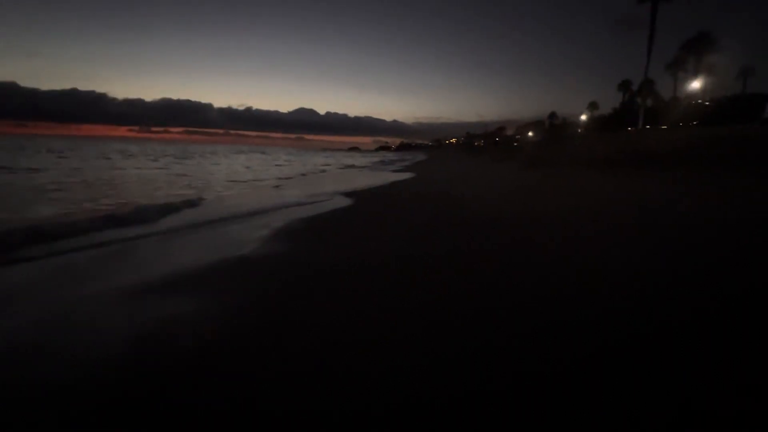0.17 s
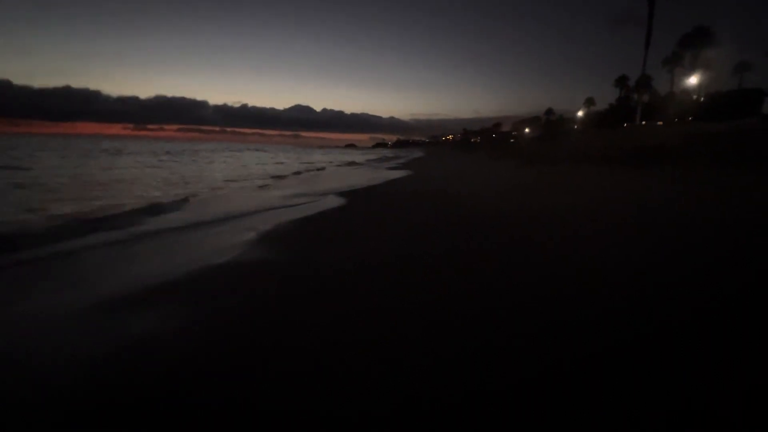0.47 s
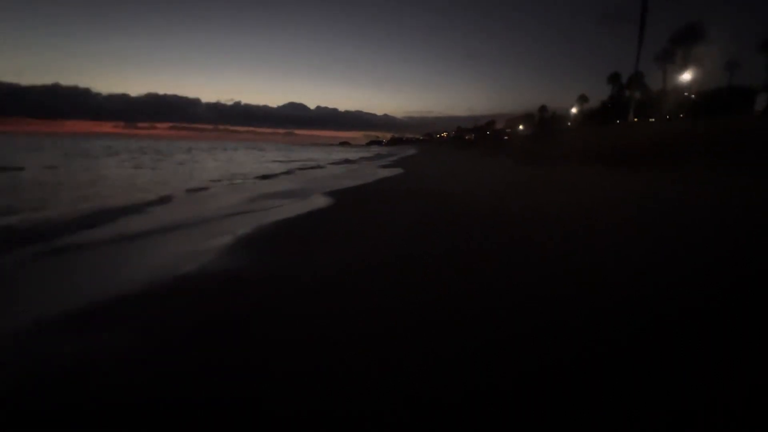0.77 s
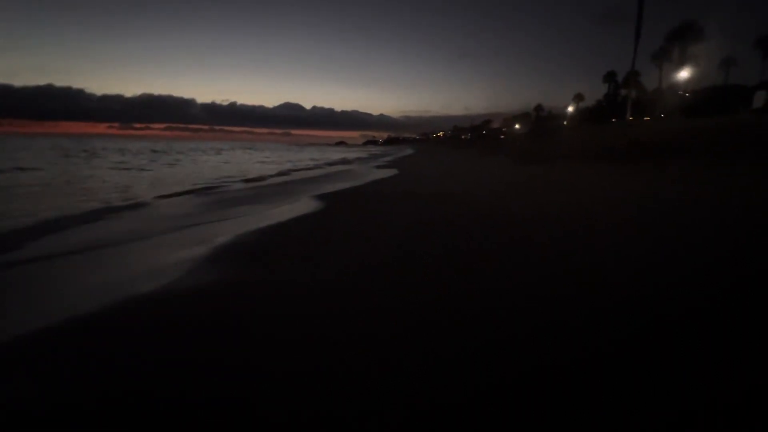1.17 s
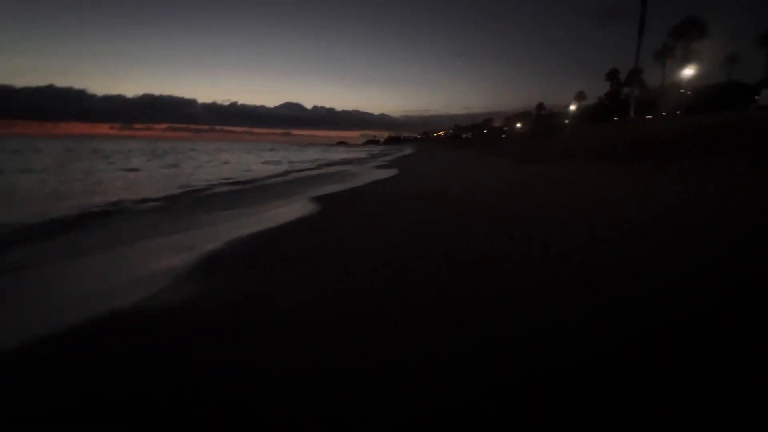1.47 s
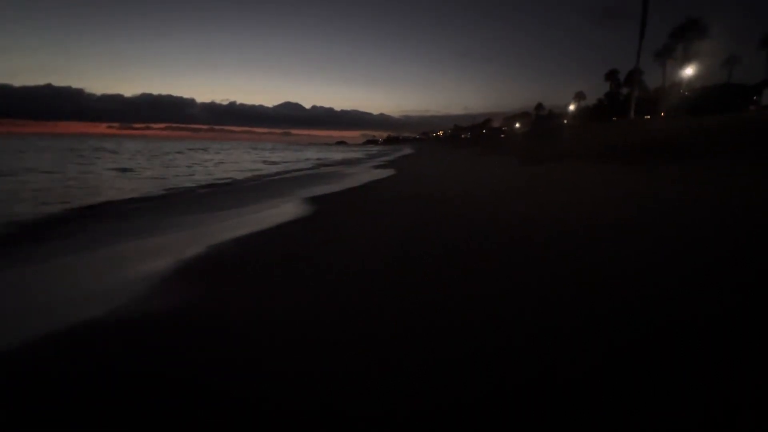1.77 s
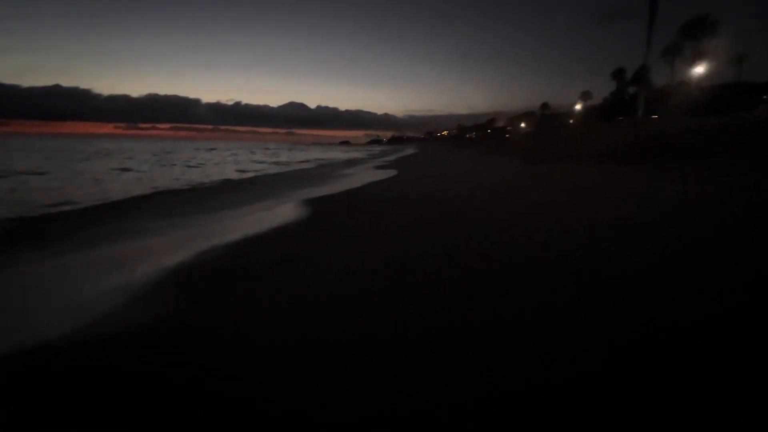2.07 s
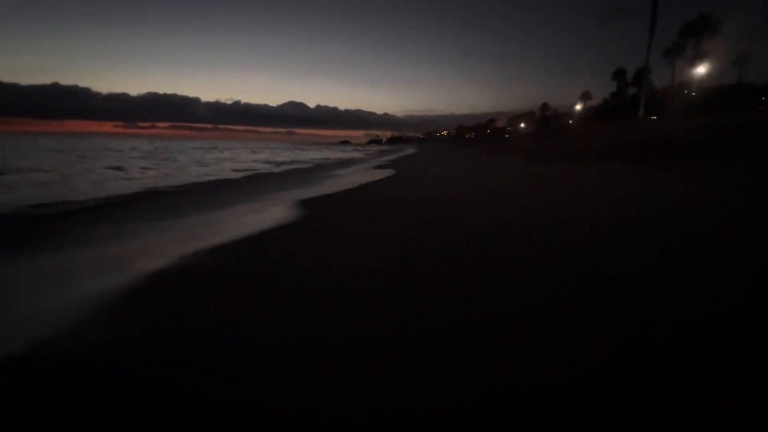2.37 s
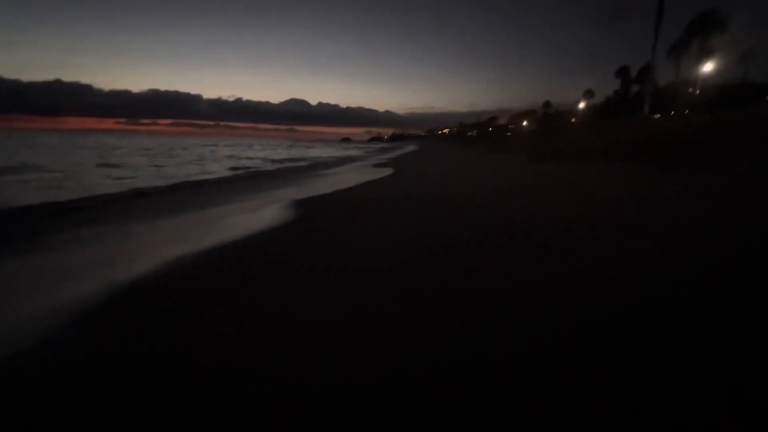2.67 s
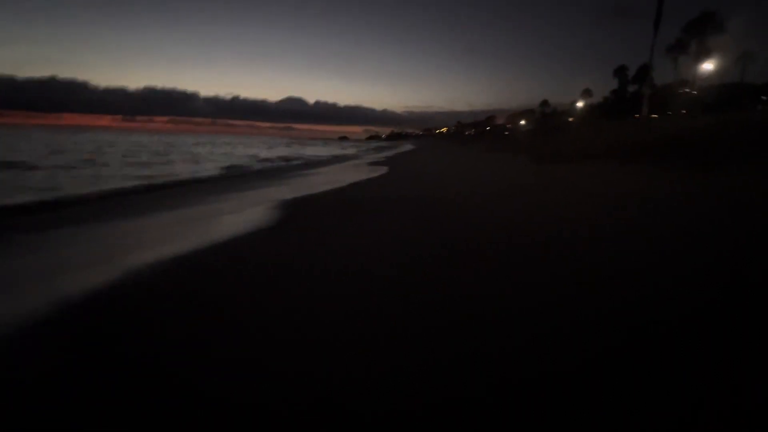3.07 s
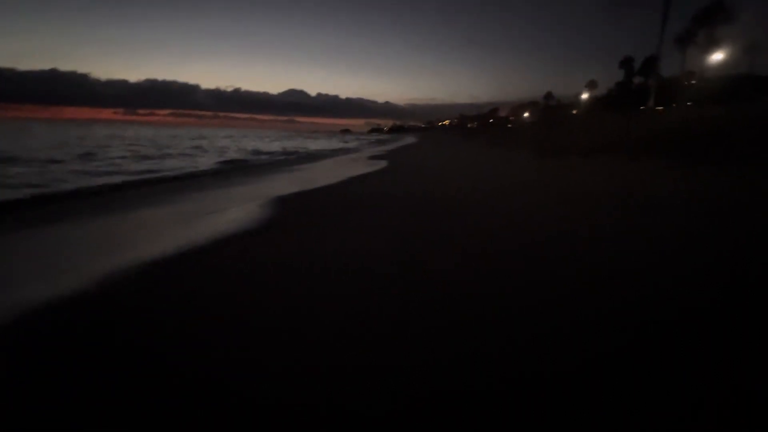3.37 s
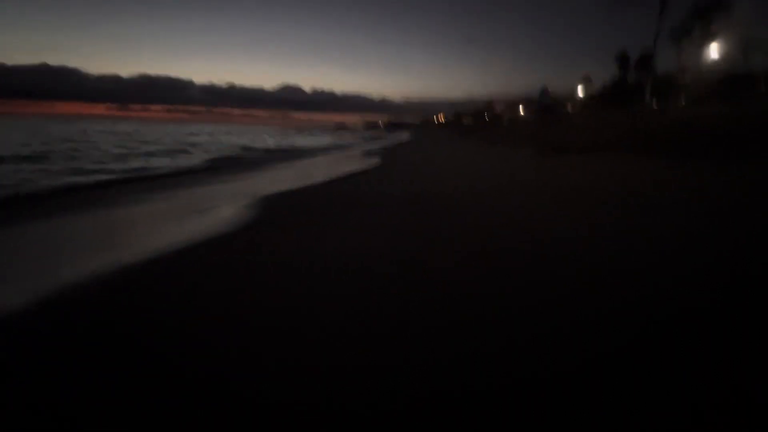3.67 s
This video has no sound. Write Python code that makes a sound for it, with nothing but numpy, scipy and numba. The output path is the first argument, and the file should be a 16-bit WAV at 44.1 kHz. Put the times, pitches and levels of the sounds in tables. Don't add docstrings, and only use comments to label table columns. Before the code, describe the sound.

Small waves washing up a sandy shore, with fizzing foam and low distant breaker rumble

```python
import sys
import numpy as np
from scipy import signal
from scipy.fft import rfft, irfft, next_fast_len
from scipy.io import wavfile
from scipy.ndimage import uniform_filter1d
from numba import njit

SR = 44100
rng = np.random.default_rng(int(sys.argv[2]) if len(sys.argv) > 2 else 0)


def voltage_ratio(decibels):
    exponent = np.asarray(decibels, float) / 20
    return 10 ** exponent


def generate_wav(sig):
    pcm = np.round(np.clip(np.atleast_2d(sig).T, -1, 1) * 32767).astype(np.int16)
    wavfile.write(sys.argv[1], SR, pcm)


N = 168021
T = np.arange(N) / SR
SIZE = next_fast_len(N)
HZ = np.maximum(np.arange(SIZE // 2 + 1) * SR / SIZE, 1)

# t/s, level/dB
RUMBLE_LEVEL = [(0, -33), (.08, -31.5), (.2, -34), (.33, -31.5), (.43, -35), (.55, -34.5), (.9, -36.5),
                (1.25, -36), (1.45, -35.5), (1.62, -37.5), (1.9, -35.5), (2.1, -36), (2.35, -36.5),
                (2.55, -36), (2.7, -38.5), (2.85, -40), (3.25, -40.5), (3.6, -38.5), (3.81, -37.5)]
ROAR_LEVEL = [(0, -40), (.5, -41.5), (.7, -43), (1.2, -42.5), (1.6, -43), (2.05, -40.5), (2.45, -42),
              (3.0, -42), (3.5, -41.5), (3.81, -42.5)]
SWASH_LEVEL = [(0, -42.5), (.22, -46.5), (.45, -43), (.8, -48), (1.3, -45.5), (1.65, -50), (2.1, -49.5),
               (2.45, -46), (3.2, -50.5), (3.55, -45), (3.81, -44)]
FOAM_LEVEL = [(0, -46.5), (.2, -51.5), (.5, -48.5), (.72, -49), (.9, -47.5), (1.08, -48.5), (1.3, -51.5),
              (1.5, -51), (1.68, -55.5), (2.0, -53), (2.15, -57), (2.38, -54), (2.6, -52.5), (2.85, -55.5),
              (3.1, -60.5), (3.5, -60.5), (3.81, -64)]
MIST_LEVEL = [(0, -50.5), (.25, -57), (.5, -54.5), (.9, -57), (1.23, -54.5), (1.65, -60.5), (2.0, -58),
              (2.15, -58.5), (2.45, -58), (2.9, -59), (3.1, -63), (3.3, -61.5), (3.6, -58.5), (3.81, -61)]
WIND_LEVEL = [(0, -52), (.15, -50), (.3, -47), (.45, -55), (1.2, -59), (1.7, -52), (1.85, -51), (2.1, -61),
              (2.3, -50), (2.75, -58), (2.93, -50.5), (3.1, -54), (3.4, -57), (3.65, -52.5), (3.81, -52)]

# f/Hz, density/dB
RUMBLE_TONE = [(22, -44), (40, -50), (65, -3.5), (110, -1), (210, -1), (320, -2), (480, -8.5), (800, -27.5)]
ROAR_TONE = [(250, -24), (450, -3.5), (620, -2.5), (800, -1.5), (1050, -2.5), (1250, -6), (1700, -8.5),
             (3000, -25)]
SWASH_TONE = [(700, -18), (1200, -3.5), (1600, -2.5), (2000, -8), (2600, -7), (3500, -11.5), (5000, -42),
              (7000, -25.5)]
FOAM_TONE = [(2000, -14), (3500, 2), (5000, -1), (6200, -3.5), (7500, -4), (9000, -12)]
MIST_TONE = [(5000, -8), (6800, -8.5), (8300, -1), (9700, 1.5), (10700, 3.5), (12300, -8), (14000, -7),
             (15800, -5)]
WIND_TONE = [(16, -26), (28, -8), (40, -7), (52, 8), (80, -11), (140, -33.5)]
TONGUE_TONE = [(600, -11), (1100, -7), (1600, 4), (2500, -8), (3500, -10), (5000, -20), (7000, -18),
               (12500, -34)]
SPIT_TONE = [(4000, -22), (9000, -1), (13000, .1), (16000, -1.0)]

# t/s, level/dB, length/s
SPITS = [
    (.0, -50, 0.034),
    (1.23, -59, .04),
    (2.028, -47, .025),
    (3.158, -47, 0.015),
    (3.69, -63, .02),
]
# t/s, level/dB, f/Hz, length/s
THUDS = [(.0, -23, 102, 0.017), (0.078, -31.5, 277, 0.033), (0.157, -36, 80, 0.046),
         (0.24, -35.5, 202, 0.053), (0.29, -41, 85, 0.041), (0.36, -33.5, 212, 0.083),
         (0.56, -39.5, 373, 0.099), (0.578, -42, 130, 0.024), (1.425, -42, 270, .04),
         (1.605, -31.5, 152, 0.018), (1.775, -40.5, 251, 0.022), (2.218, -36.5, 150, 0.047),
         (2.33, -42, 120, .03), (2.405, -38.5, 330, 0.055), (2.455, -37, 129, 0.02),
         (2.551, -35.5, 253, 0.024), (2.59, -39, 120, 0.036), (3.03, -44, 65, 0.061),
         (3.427, -53, 90, 0.064)]
TONGUE_S, TONGUE_DB = (.55, .85, 1.3, 1.6), -44.5

# f/Hz, gain/dB
LEFT_PORT = [(200, 3.5), (600, 3), (900, 3.5), (2000, 4), (3600, 2), (6800, 1), (9200, 0.5), (10000, -1)]
# f/Hz, width/Hz, gain/dB
LEFT_RINGS = [(5090, 1250, 11.2), (8380, 200, 2.2)]
# f/Hz, share/1
COMMON_SHARE = [(100, 0.86), (400, 0.78), (800, 0.86), (1100, 0.49), (2500, 0.4), (3500, 0.25),
                (6000, 0.47), (9000, 0)]
PORT_LAG_S = 0.000409

# f/Hz, width/Hz, gain/dB
TREBLE_GAPS = [(5310, 110, -9), (7500, 220, -4)]
# from f/Hz, to f/Hz, slope/Hz, gain/dB
SUM_LOST = [(10200, 11300, 600, -17), (15300, 17000, 300, -8)]
DIFFERENCE_LOST = [(12500, 14350, 400, -22), (7300, 7800, 300, -3)]
CANCEL_LOST = [(3250, 3500, 150, -16), (3500, 3750, 150, -16)]
NEAR_LOST = [(11500, 11950, 150, -15), (11950, 12400, 150, -15), (12400, 12900, 150, -13),
             (1120, 1310, 140, -8), (8700, 9300, 200, -5)]
WIDE_SUM_LOST = [(9650, 10300, 400, -20)]
SUM_EDGES = [(11100, 11560, 150, -16), (15200, 15800, 200, -14), (14800, 15200, 200, -7),
             (7300, 7600, 150, -9), (7600, 7850, 150, -7), (6500, 6900, 200, -6)]
NEAR_DIFFERENCE_LOST = [(6950, 7500, 200, -16), (11900, 12500, 200, -12)]
DIFFERENCE_EDGES = [(12050, 12600, 300, -14), (14250, 14700, 200, -20), (14700, 15200, 200, -14),
                    (9300, 9600, 200, -7), (11400, 12000, 200, -6), (6500, 7000, 200, -7)]
# t/s, share/1
CANCELLING = [(0, 0), (.5, 0.3), (.95, 0.6), (1.45, 0.5), (1.7, 0), (1.88, 0.6), (2.05, 0.1), (2.3, 0.6),
              (2.7, 0.6), (3.0, 0.44), (3.81, .2)]
# t/s, share/1
WIDENING = [(0, .1), (.12, 0.3), (.45, 0.5), (.6, 0.7), (.85, .95), (1.0, .95), (1.07, 0.4), (1.4, 0.4),
            (1.48, .95), (1.6, 0.5), (2.3, 0), (2.7, 0.44), (3.1, 0.4), (3.5, .2), (3.81, .5)]


def read(table):
    t_s, value = np.transpose(table)
    return np.interp(T, t_s, value)


def tone(table):
    f_hz, value = np.transpose(table)
    return np.interp(np.log(HZ), np.log(f_hz), value)


def walk(rate_hz):
    hold = int(SR / rate_hz)
    steps = np.repeat(rng.standard_normal(N // hold + 1), hold)
    return 0.9 * uniform_filter1d(uniform_filter1d(steps, hold), hold)[:N]


def left_port():
    rings_db = sum(db * np.exp(-((HZ - hz) / width_hz) ** 2) for hz, width_hz, db in LEFT_RINGS)
    return voltage_ratio(tone(LEFT_PORT) + rings_db)


def ports(streams, colour, lag_s, shared_db, shared_hz, own_db, own_hz, turn_rad=0.):
    common, left, right = (rfft(s, SIZE) for s in streams)
    share = tone(COMMON_SHARE)
    common = share ** .5 * common
    late = common * np.exp(-2j * np.pi * HZ * lag_s - 1j * turn_rad)
    left = (common + (1 - share) ** .5 * left) * left_port()
    right = late + (1 - share) ** .5 * right
    pair = np.array([left, right]) * voltage_ratio(tone(colour))

    swell_db = shared_db * walk(shared_hz)
    lo_hz, hi_hz = colour[0][0], colour[-1][0]
    out = 0
    for hz in lo_hz * 2 ** np.arange(0, np.log2(hi_hz / lo_hz) + 1, 1 / 2):
        band = np.cos(np.pi / 2 * np.clip(2 * np.log2(HZ / hz), -1, 1)) ** 2
        out = out + irfft(pair * band, SIZE)[:, :N] * voltage_ratio(swell_db + own_db * walk(own_hz))
    return out / out.std()


def rumble():
    low = ports(rng.standard_normal((3, N)), RUMBLE_TONE, .0001, 0.39, 10.0, 0.83, 7.1)
    return low * voltage_ratio(read(RUMBLE_LEVEL) + 0.76)


@njit
def ring(start, hz, cycles, size, glide, length):
    out = np.zeros(length)
    for g in range(len(start)):
        n = int(SR / hz[g] * cycles) + 2
        z = size[g] + 0j
        step = np.exp(2j * np.pi * hz[g] / SR - 4. / n)
        turn = np.exp(2j * np.pi * hz[g] / SR * glide / n)
        for i in range(start[g], min(start[g] + n, length)):
            out[i] += z.imag
            z *= step
            step *= turn
    return out


def bubbles(lo_hz, hi_hz, cycles, scatter_db, share, count):
    streams = []
    for _ in range(3):
        when, pitch, odd = rng.random((count, 3)).T
        hz = lo_hz * (hi_hz / lo_hz) ** pitch
        size = hz * voltage_ratio(-scatter_db * np.log(odd + 1e-9))
        b = ring((when * N).astype(np.int64), hz, cycles, size, 0.19, N)
        streams.append(np.sqrt(share) * b / b.std() + np.sqrt(1 - share) * rng.standard_normal(N))
    return streams


def roar():
    streams = bubbles(313.4, 2524.0, 11.6, 1.6, 0.3, count=9000)
    pair = ports(streams, ROAR_TONE, 0.00014, 0.26, 5.8, 1.0, 7.36, turn_rad=1.76)
    return pair * voltage_ratio(read(ROAR_LEVEL) + 6.0)


def swash():
    streams = bubbles(735.0, 6180.0, 7.1, 2.6, 0.52, count=20000)
    pair = ports(streams, SWASH_TONE, PORT_LAG_S, 0.2, 9.0, 1.0, 14.0)
    return pair * voltage_ratio(read(SWASH_LEVEL) + 3.5)


def foam():
    large = bubbles(1830.0, 8700.0, 4.5, 0.51, 0.53, count=30000)
    small = bubbles(5600.0, 18300.0, 5.0, 1.8, 0.79, count=40000)
    coarse = ports(large, FOAM_TONE, PORT_LAG_S, 0.74, 14., 0.39, 11.6)
    mist = ports(small, MIST_TONE, PORT_LAG_S, .7, 12., 1.6, 16.)
    fizz = coarse * voltage_ratio(read(FOAM_LEVEL) + 4.5) + mist * voltage_ratio(read(MIST_LEVEL) + 8.0)
    return fizz * voltage_ratio(1.2 * walk(20.0))


def spits():
    shape = sum(voltage_ratio(db) * (T >= s) * np.exp(-np.abs(T - s) / length_s) for s, db, length_s in SPITS)
    hiss = irfft(rfft(rng.standard_normal((2, N)), SIZE) * voltage_ratio(tone(SPIT_TONE)), SIZE)[:, :N]
    return hiss / hiss.std() * shape


def wind():
    common_share = 0.26
    left, right, common = rng.standard_normal((3, N))
    noise = np.array([left, right]) * (1 - common_share) ** .5 + common * common_share ** .5
    gusts = irfft(rfft(noise, SIZE) * voltage_ratio(tone(WIND_TONE)), SIZE)[:, :N]
    return gusts / gusts.std() * voltage_ratio(read(WIND_LEVEL) + 3.0)


def thuds():
    width, left_db = 0.22, 4.5
    noise = rfft(rng.standard_normal(N), SIZE)
    out = 0
    for s, db, hz, length_s in THUDS:
        shape = np.exp(-((T - s) / length_s) ** 2)
        body = shape * irfft(noise * np.exp(-(np.log(HZ / hz) / width) ** 2), SIZE)[:N]
        out = out + voltage_ratio(db) * body * np.sqrt(np.sum(shape ** 2) / np.sum(body ** 2))
    return out * voltage_ratio(np.array([[left_db / 2], [-left_db / 2]]))


def tongue():
    stream = bubbles(710.0, 13300.0, 5.2, 1.5, 0.4, count=30000)[0]
    common = rfft(stream, SIZE) * voltage_ratio(tone(TONGUE_TONE))
    late = common * np.exp(-2j * np.pi * HZ * PORT_LAG_S)
    pair = irfft(np.array([common * left_port(), late]), SIZE)[:, :N]
    shape = np.interp(T, TONGUE_S, (0, 1, 1, 0))
    return pair / pair.std() * shape * voltage_ratio(TONGUE_DB + 1.1 * walk(9.9))


def scene():
    return rumble() + roar() + swash() + foam() + spits() + wind() + thuds() + tongue()


def lost(rows):
    return voltage_ratio(sum(db * np.clip(np.minimum(HZ - lo_hz, hi_hz - HZ) / slope_hz + .5, 0, 1)
                   for lo_hz, hi_hz, slope_hz, db in rows))


def fade(x, rows, share, flicker):
    spectrum = rfft(x, SIZE)
    removed = 0
    for row in rows:
        depth = np.clip(share + flicker * walk(25.), 0, 1)
        removed = removed + depth * irfft(spectrum * (1 - lost([row])), SIZE)[:N]
    return x - removed


def roll_off(x):
    return signal.sosfilt(signal.butter(12, 15730, fs=SR, output="sos"), x)


def record(dry):
    ceiling, top_hz = voltage_ratio(-12.5), 15800
    dry = np.tanh(dry / ceiling) * ceiling
    gaps_db = sum(db * np.exp(-((HZ - hz) / width_hz) ** 4) for hz, width_hz, db in TREBLE_GAPS)
    left, right = rfft(dry, SIZE) * voltage_ratio(gaps_db) * (HZ < top_hz)
    mid = irfft((left + right) / 2 * lost(SUM_LOST), SIZE)[:N]
    side = irfft((left - right) / 2 * lost(DIFFERENCE_LOST), SIZE)[:N]

    near = np.interp(T, TONGUE_S, (.1, .75, .75, .1))
    mid = fade(mid, CANCEL_LOST, read(CANCELLING), .25)
    mid = fade(mid, NEAR_LOST, near, .3)
    mid = fade(mid, WIDE_SUM_LOST, read(WIDENING), .25)
    mid = fade(mid, SUM_EDGES, .75, .4)
    side = fade(side, NEAR_DIFFERENCE_LOST, near + .15, .2)
    side = fade(side, DIFFERENCE_EDGES, .55, .45)
    return roll_off(np.array([mid + side, mid - side]))


dry = scene()
out = record(dry)
generate_wav(out)
```